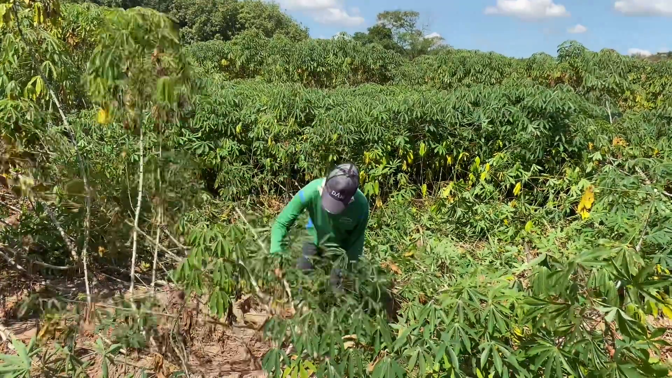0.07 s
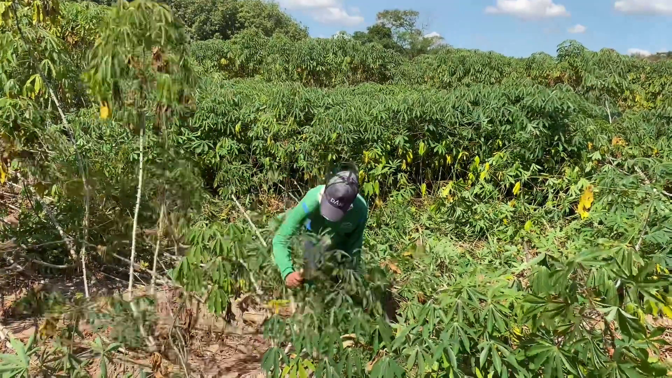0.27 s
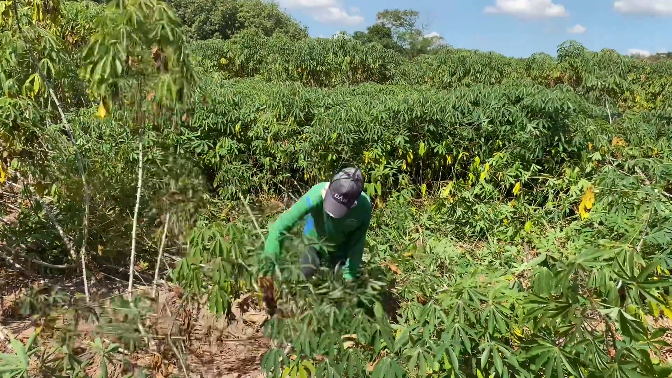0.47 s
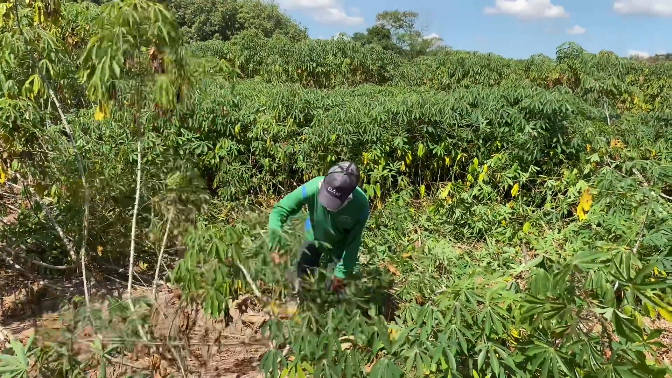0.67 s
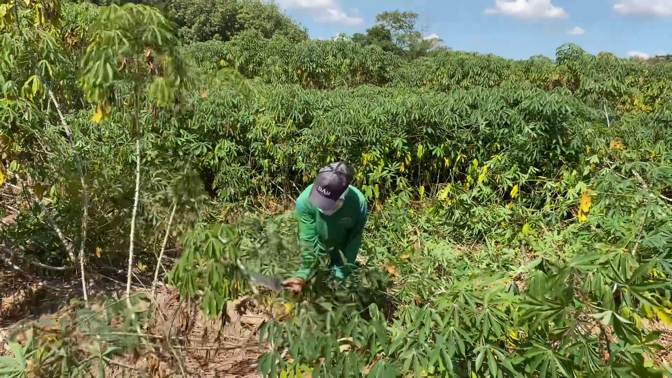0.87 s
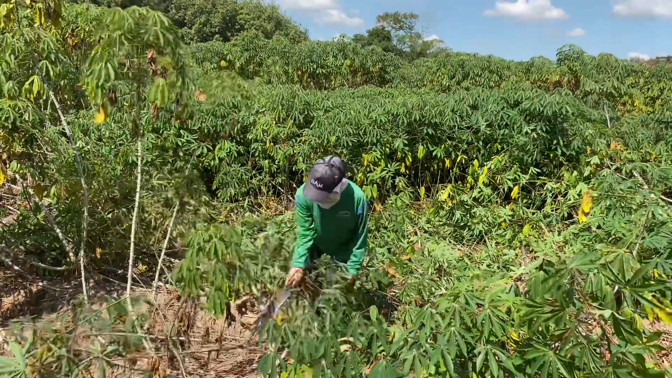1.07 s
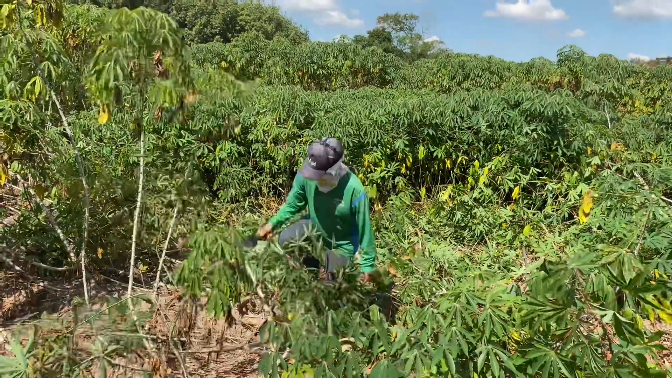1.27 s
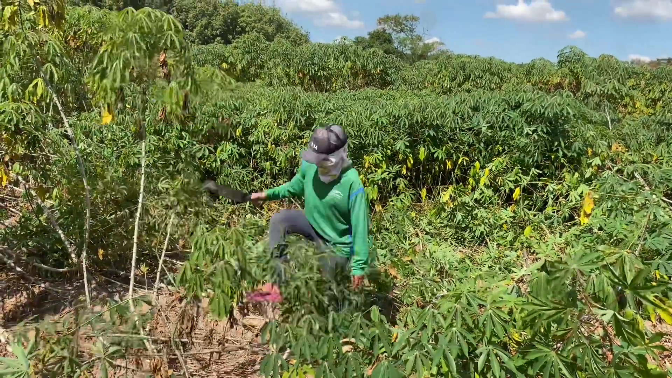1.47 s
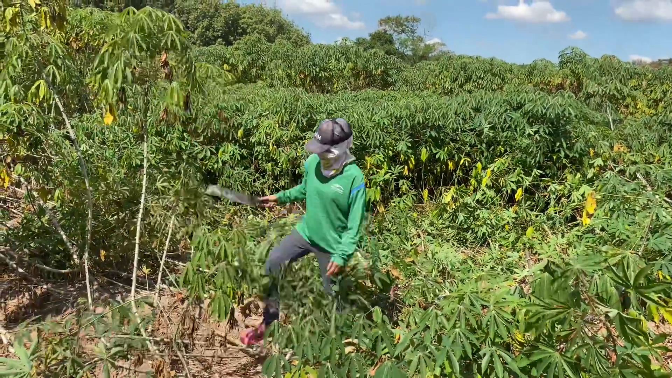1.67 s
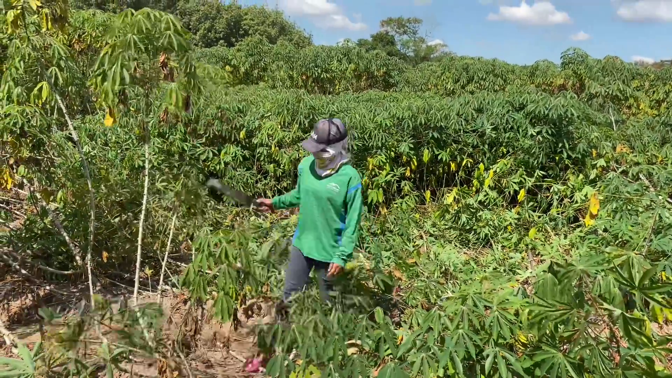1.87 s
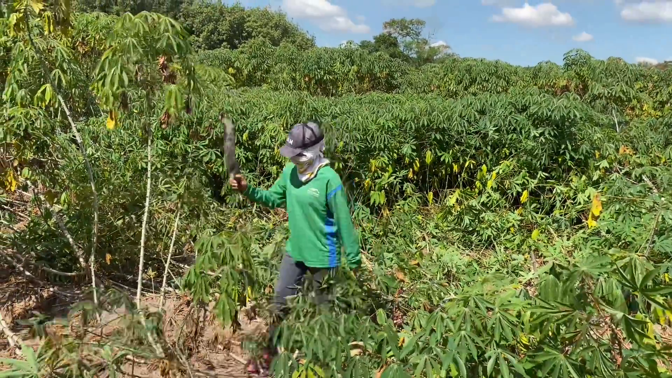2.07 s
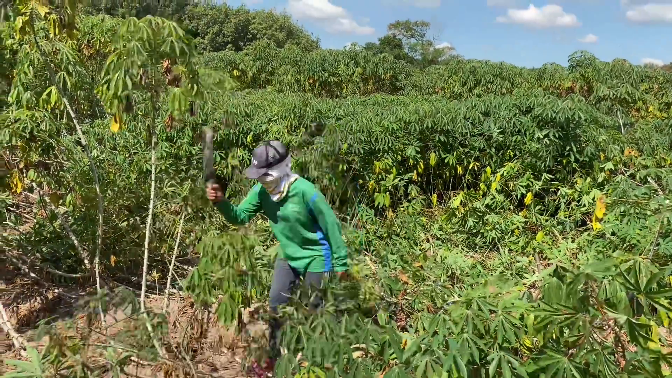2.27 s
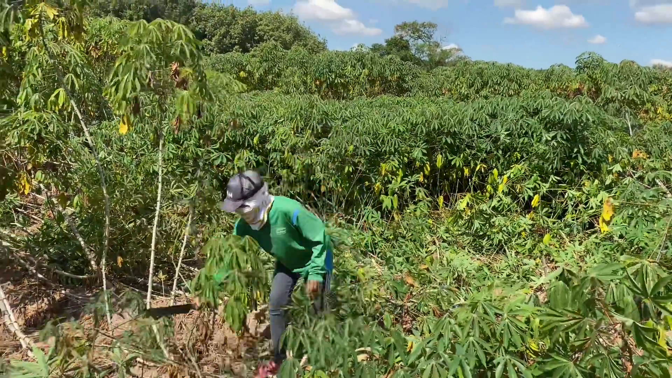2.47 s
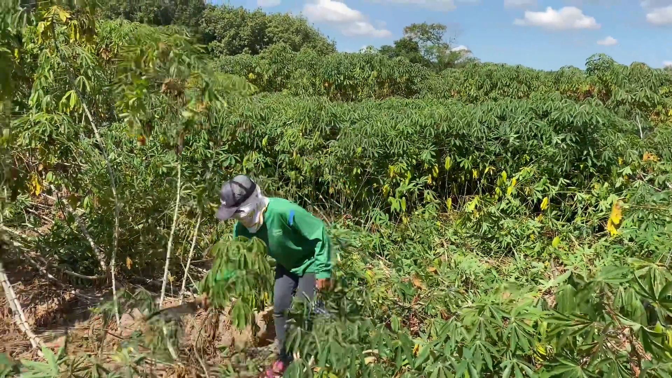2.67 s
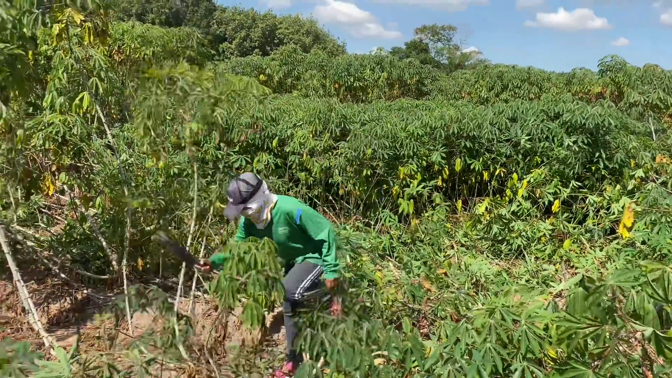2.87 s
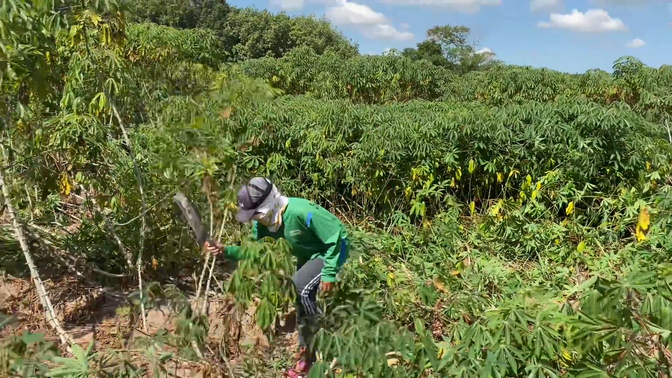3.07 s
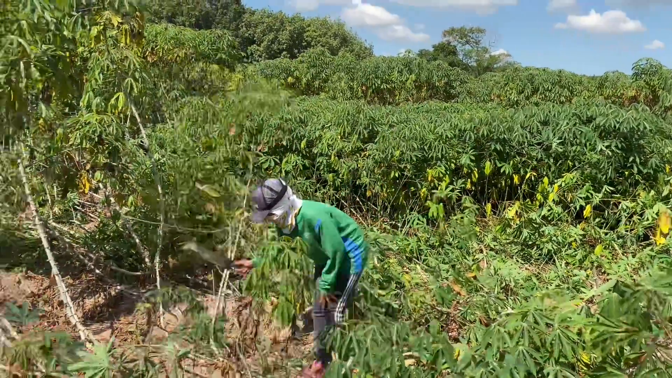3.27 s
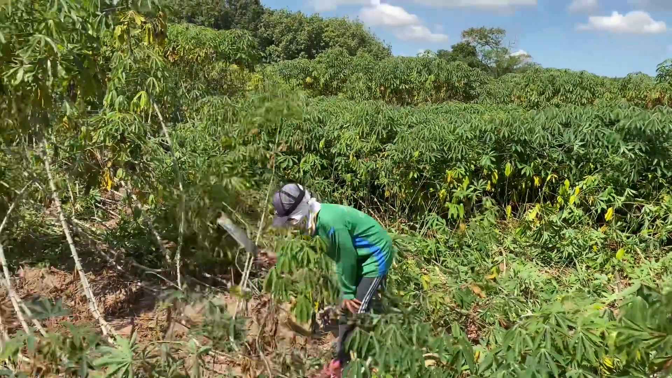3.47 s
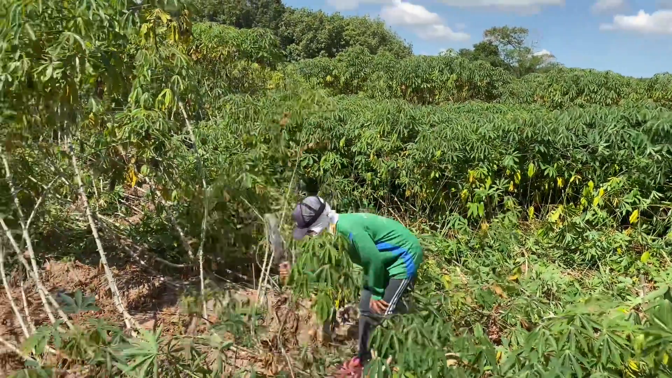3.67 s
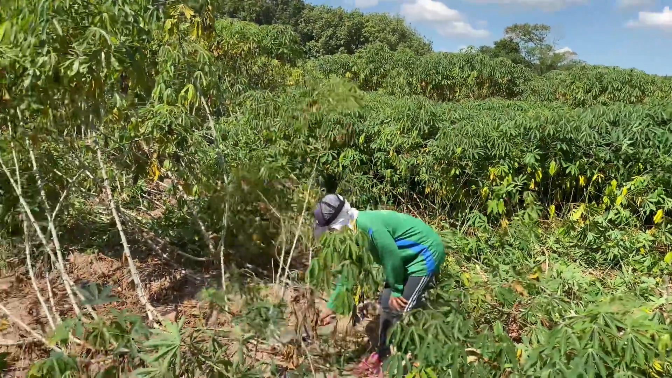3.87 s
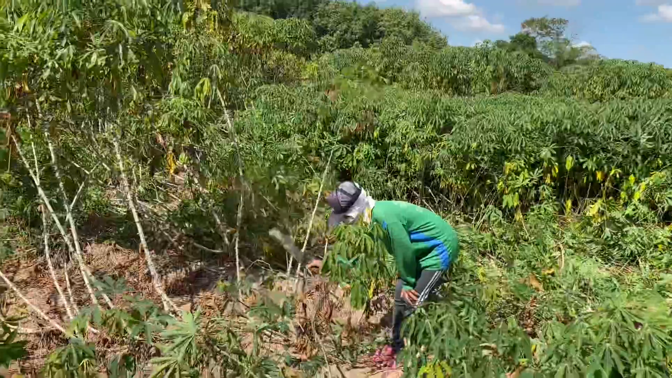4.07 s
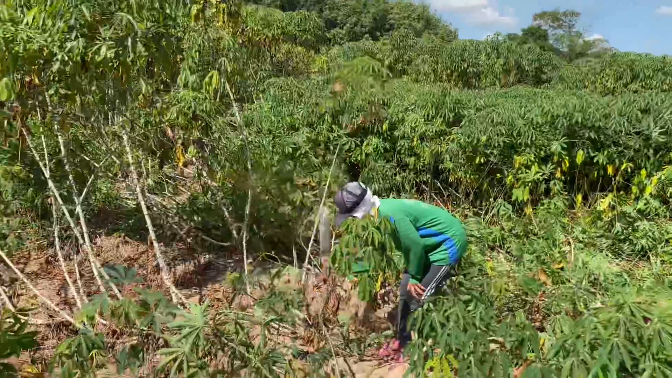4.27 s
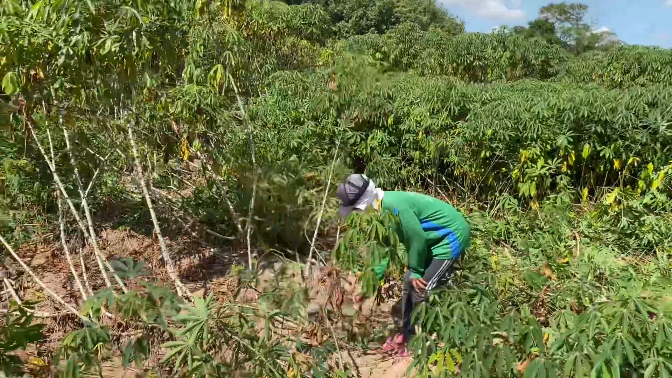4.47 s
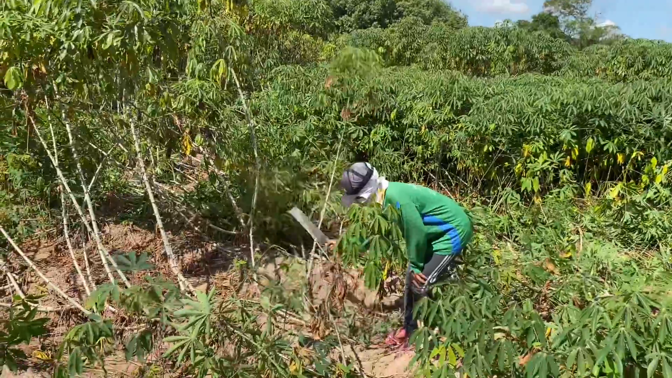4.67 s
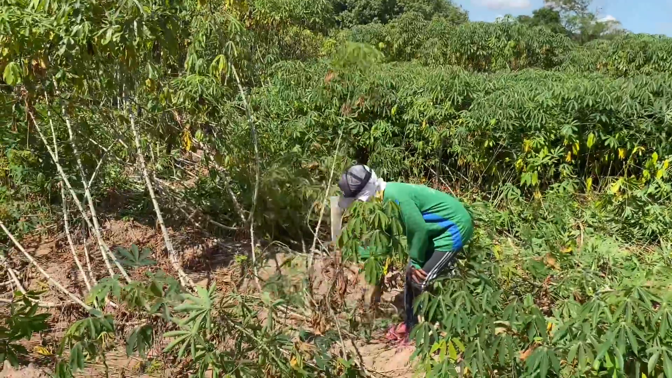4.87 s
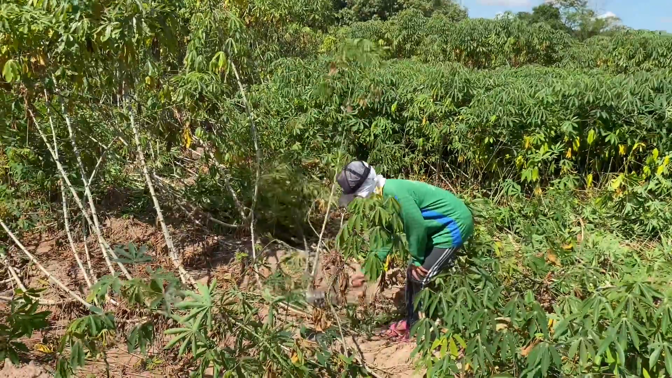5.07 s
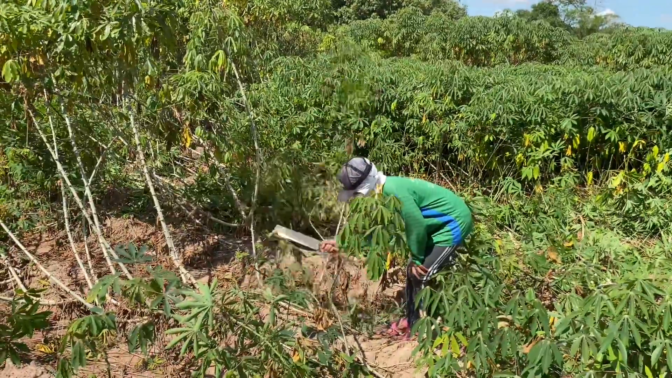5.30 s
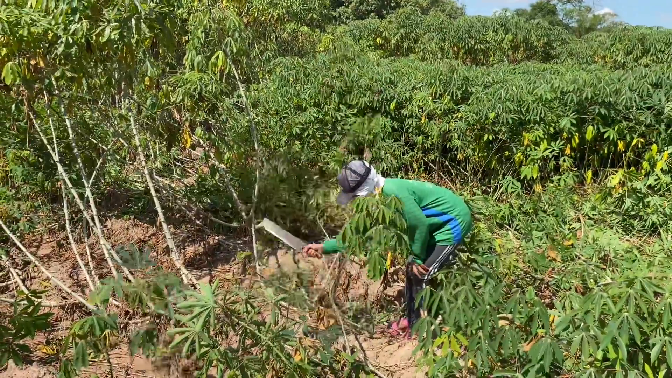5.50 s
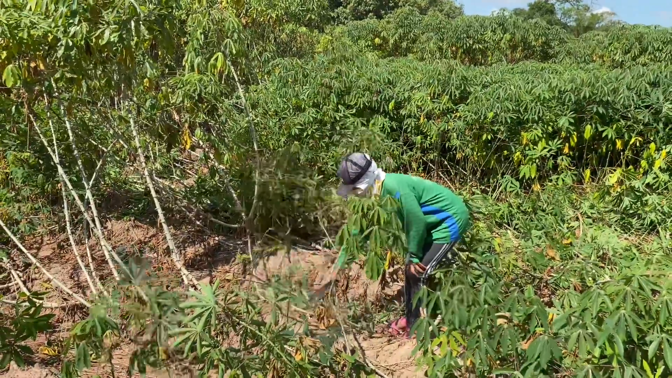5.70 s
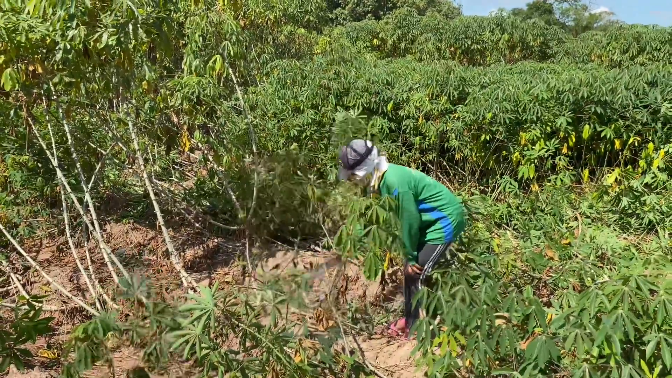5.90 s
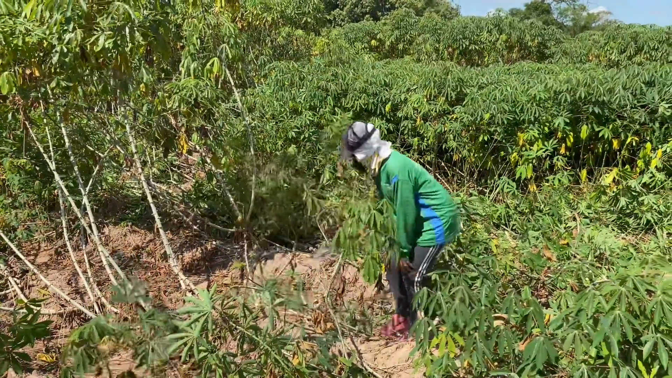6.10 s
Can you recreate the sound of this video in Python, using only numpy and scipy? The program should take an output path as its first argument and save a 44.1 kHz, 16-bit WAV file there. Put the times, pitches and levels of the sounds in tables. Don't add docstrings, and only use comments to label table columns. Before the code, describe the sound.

Dry, sharp chops through fibrous stems, each with a crunchy tear, dull knock, leafy slap and brief steel ring. They come singly or in small clusters, separated by swishing leaves and little stick cracks. The place is open and leafy, with only short diffuse echoes. Wind rumbles softly, growing at the end; a distant machine hums and a small bird chirps once, faintly, past the middle.

```python
import sys
import numpy as np
from scipy import signal
from scipy.fft import rfft, irfft, next_fast_len
from scipy.io import wavfile
from scipy.ndimage import uniform_filter1d, minimum_filter1d, map_coordinates

SR = 44100
rng = np.random.default_rng(int(sys.argv[2]) if len(sys.argv) > 2 else 0)


def invert_db(level):
    return 10 ** (np.asarray(level, dtype=float) / 20)


def put_to_file(sound):
    columns = np.atleast_2d(sound).T
    safe = np.clip(columns, -1, 1)
    whole_steps = np.round(safe * 32767)
    wavfile.write(sys.argv[1], SR, whole_steps.astype(np.int16))


N = 270729


def unit(x):
    return x / np.sqrt(np.mean(x ** 2) + 1e-20)


def along(points, hz):
    f, v = np.transpose(points)
    return np.interp(np.log(hz + 1), np.log(f + 1), v)


def curves(rows):
    s, *columns = np.transpose(rows)
    return [np.interp(np.arange(N) / SR, s, column) for column in columns]


def wobble(rate):
    knots = rng.standard_normal(int(N * rate / SR) + 4)
    return map_coordinates(knots, [np.arange(N) * rate / SR])


def filtered(x, response):
    n = x.shape[-1]
    m = next_fast_len(n + 4096)
    return irfft(rfft(x, m) * response(np.fft.rfftfreq(m, 1 / SR)), m)[..., :n]


def peak(f, hz, width_hz):
    return 1j * f * width_hz / (hz * hz - f * f + 1j * f * width_hz)


def crackle(shape, spectrum, spread_db, envelope=1):
    size = invert_db(spread_db * np.minimum(rng.exponential(size=shape), 3.5))
    grains = size * rng.standard_normal(shape)
    grains = envelope * filtered(grains, lambda f: invert_db(along(spectrum, f)))
    return unit(grains) * np.sqrt(np.mean(np.square(envelope)))


def warble(rows, scatter_hz, patchy_db, rate):
    hz, db = curves(rows)
    level = invert_db(db + patchy_db * wobble(rate))
    return level * np.sin(2 * np.pi * np.cumsum(hz + scatter_hz * wobble(rate)) / SR)


# pitch_hz, side_level_db
WIDTH = [(60, -15.5), (300, -5.5), (1500, -3.5), (3000, -3.5), (6000, -1.5), (6500, -82)]


def wide(pair):
    side = filtered(pair[1], lambda f: invert_db(along(WIDTH, f)))
    return np.array([pair[0] + side, pair[0] - side])


# time_s, level_db
WIND = [(0, -52), (1.1, -54), (2.2, -54), (2.8, -52.5), (3.6, -56.5), (4.8, -51), (5.5, -54.5),
        (5.75, -45.5), (6.14, -41)]
# pitch_hz, level_db (per Hz)
RUMBLE = [(15, -40), (30, -12.5), (71, 1.5), (188, -15), (227, -27), (300, -26), (390, -65), (660, -120)]
# peak_s, level_db
JOLTS = [(.34, -40), (.87, -46), (1.49, -40), (1.66, -46), (2.436, -32.5), (2.77, -57), (3.74, -46),
         (4.32, -43.5), (4.46, -45), (4.91, -39.5), (5.3, -45), (5.42, -53), (5.86, -54), (5.95, -34.5)]
JOLT_RISE_S, JOLT_FALL_S = 0.018, 0.027


def wind():
    t = np.arange(N) / SR
    jolts = 0
    for s, db in JOLTS:
        jolts = jolts + invert_db(db) * np.exp(-np.maximum((s - t) / JOLT_RISE_S, (t - s) / JOLT_FALL_S))
    lumps = invert_db(2.8 * wobble(7.5) + 0.82 * wobble(18))
    buffets = invert_db(curves(WIND)[0]) * unit(lumps * crackle((2, N), RUMBLE, spread_db=-3.5))
    return wide(buffets + jolts * crackle((2, N), RUMBLE, spread_db=-5.0))


# time_s, level_db
STIR = [(0.0, -55.5), (0.3, -51), (0.48, -46), (0.63, -51.5), (0.99, -62.5), (1.4, -55), (1.55, -70),
        (1.66, -44.5), (1.85, -56), (2.22, -57.5), (3.1, -52), (3.5, -58.5), (4.15, -53.5), (4.8, -59),
        (5.2, -53.5), (5.45, -53.5), (5.75, -51.5), (6.14, -61.5)]
# pitch_hz, level_db (per Hz)
LEAVES = [(1000, -19), (2000, 0), (4000, -1), (7000, 1.5), (10000, 0.5), (13000, -1), (15500, -2.5)]
# pitch_hz, level_db (per Hz)
STEMS = [(120, -23), (250, -1.5), (500, -4.5), (1000, -3), (1600, -8.5), (2800, -29.5)]
SHIVER_DB, SHIVER_T60_S = -44, 0.93
STEM_DB, STEM_FOLLOWS = -58, 0.41
DRAG_S, DRAG_HALF_S, DRAG_DB = 1.674, 0.076, -54


def plants():
    t = np.arange(N) / SR
    shiver = 0
    for s, db, *_ in CHOPS + SPLITS:
        shiver = shiver + (t > s) * invert_db(db + SHIVER_DB - 60 * np.abs(t - s) / SHIVER_T60_S) ** 2
    leaf = np.sqrt(invert_db(curves(STIR)[0]) ** 2 + shiver)
    stem = invert_db(STEM_DB) * (leaf / np.median(leaf)) ** STEM_FOLLOWS
    stem = stem + invert_db(DRAG_DB) * np.exp(-((t - DRAG_S) / DRAG_HALF_S) ** 4)
    stir = wobble(24.9)
    leaf = leaf * invert_db(5.0 + 0.62 * stir + 1.21 * wobble(110))
    stem = stem * invert_db(2.1 * stir + 0.48 * wobble(40))
    leaves = leaf * crackle((2, N), LEAVES, spread_db=2.0)
    stems = stem * crackle((2, N), STEMS, spread_db=2.5)
    return wide(leaves + stems)


# pitch_hz, width_hz, level_db
DRONE = [(855.5, 55, -69), (1530, 1350, -68), (1690, 90, -72)]
# time_s, pitch_hz, level_db
WHINE = [(0, 1700, -72), (1.1, 1715, -65), (1.8, 1700, -72), (2.2, 1700, -65), (3.6, 1690, -70),
         (4.8, 1690, -63), (5.05, 1574, -59), (5.3, 1580, -68), (6.14, 1630, -70)]


def machine():
    noise = rng.standard_normal((2, N))
    drone = 0
    for hz, width_hz, db in DRONE:
        band = unit(filtered(noise, lambda f: peak(f, hz, width_hz) ** 2))
        drone = drone + invert_db(db + 1.5 * wobble(5)) * band
    whine = invert_db(3 * wobble(5)) * warble(WHINE, scatter_hz=90, patchy_db=4, rate=130)
    return wide(drone) + whine


# knock_db, slap_db
KINDS = [
    (-29, -14),
    (-30.5, -23),
    (-32.5, -20.5),
    (-28, -8),
]
# start_s, peak_db, t60_s, stalk_pitch_hz
CHOPS = [(0.256, -27, 0.25, 4100), (0.284, -6, 0.074, 2340), (0.291, -9, 0.04, 1150),
         (0.297, -10, 0.033, 2650), (0.307, -14.5, 0.042, 2170), (1.467, -7.5, 0.017, 2980),
         (2.41, -20.5, 0.16, 2700), (2.421, -13.5, 0.069, 1440), (2.427, -13.5, 0.053, 2810),
         (2.437, -21, 0.15, 2280), (3.722, -4.5, 0.04, 2280), (4.296, -8, 0.047, 2140),
         (4.316, -20.5, 0.2, 2110), (4.903, -13, 0.034, 2050), (4.909, -17, 0.087, 2250),
         (5.554, -15.5, 0.049, 2380), (5.572, -21.5, 0.15, 2150), (5.637, -27, 0.042, 3020),
         (5.649, -23.5, 0.082, 2960)]
# start_s, peak_db, t60_s, stem_pitch_hz
SPLITS = [
    (0.832, -20.5, 0.039, 872),
    (0.843, -5.5, 0.042, 760),
    (0.852, -13.5, 0.055, 1240),
    (0.871, -20.5, 0.072, 2200),
    (3.106, -22, 0.036, 2700),
    (3.147, -16.5, 0.021, 724),
    (3.717, -9, 0.049, 1180),
    (3.744, -16.5, 0.11, 2100),
    (4.896, -6.5, 0.057, 2020),
    (5.27, -17, 0.044, 1240),
]
# start_s, peak_db, t60_s, stick_pitch_hz
STICKS = [(1.255, -36, 0.043, 1310), (1.349, -36.5, 0.076, 2770), (2.052, -24.5, 0.013, 950),
          (2.561, -35, 0.094, 2125), (3.702, -31.5, 0.03, 1150), (3.789, -29.5, 0.27, 2060),
          (4.697, -37.5, 0.063, 1940), (4.871, -30, 0.024, 1710), (4.986, -33, 0.05, 2610),
          (5.111, -50, 0.039, 1530), (5.474, -31.5, 0.058, 2430), (5.707, -33.5, 0.09, 802)]
# start_s, peak_db, t60_s, branch_pitch_hz
BRANCHES = [(0.087, -41, 0.022, 1050), (0.488, -34.5, 0.047, 2070), (1.088, -48.5, 0.029, 2080),
            (1.514, -25.5, 0.018, 2270), (1.57, -30.5, 0.039, 3080), (1.582, -26.5, 0.057, 1120),
            (2.099, -44, 0.25, 885), (2.876, -35, 0.012, 2880), (2.937, -52, 0.033, 918),
            (3.353, -36.5, 0.027, 3700), (3.474, -52, 0.072, 845), (4.768, -47.5, 0.022, 810),
            (5.19, -45, .03, 3000), (5.369, -43, 0.034, 2880), (5.515, -36, 0.07, 3650),
            (5.541, -32, 0.08, 4060), (6.105, -59, 0.045, 850)]
# pitch_hz, level_db (per Hz)
FIBRE = [(400, -7.5), (800, -5), (1200, 0.5), (2100, -0.5), (3500, -2), (5000, -9.5), (9000, -13)]
# pitch_hz, level_db (per Hz)
SLAP = [(2500, -14.5), (4500, -4.5), (6500, -1), (9000, 0.5), (12000, -6), (15500, -5.5)]
# pitch_hz, level_db (per Hz)
KNOCK = [(60, 1), (110, 5), (200, 6), (400, -4.5), (700, -2), (1200, -22.5)]
# one row each for mid_db, side_db
NEAR = np.array([[0], [-6]])
KNOCK_LAGS, SLAP_LAGS = 0.41, 0.26


def cuts():
    out, t = np.zeros((2, N + SR)), np.arange(SR // 6) / SR
    clumps = np.pad(invert_db(2 * wobble(300)), (0, SR))

    def dies(t60, rise_s):
        return invert_db(-60 * (t / np.clip(t60, .006, .2)) ** 1.254) * (1 - np.exp(-t / rise_s))

    first = 1.08 * dies(0.0049, 0.0001)
    for rows, (knock_db, slap_db) in zip((CHOPS, SPLITS, STICKS, BRANCHES), KINDS):
        for s, db, t60, hz in rows:
            tears = clumps[round(s * SR):][:len(t)] * dies(t60, 0.00075)
            snaps = crackle((2, len(t)), FIBRE, spread_db=4.5, envelope=first + tears)
            snaps = filtered(snaps, lambda f: 0.65 + 1.22 * peak(f, hz, 0.13 * hz) + .7 * peak(f, 5430, 450))
            knock = crackle(len(t), KNOCK, spread_db=-0.5, envelope=dies(2.62 * t60, 0.0023))
            knock = invert_db(knock_db - KNOCK_LAGS * db) * knock
            slap = crackle((2, len(t)), SLAP, spread_db=-0.5, envelope=first + dies(1.37 * t60, 0.00091))
            slap = invert_db(slap_db - SLAP_LAGS * db) * slap
            blow = wide(invert_db(NEAR - 11.5) * snaps + invert_db(-2.22) * slap) + knock
            out[:, round((s - .0001) * SR):][:, :len(t)] += invert_db(db) * blow
    return out[:, :N]


# start_s, main_level_db, t60_s, lesser_modes_db, until_damped_s
RINGS = [
    (.295, -37, .6, -1, .21),
    (.748, -47, .7, -8, .075),
    (.872, -35, .3, -3, .03),
    (.95, -50, .5, -1, .12),
    (2.555, -48, .4, 5, .09),
    (3.735, -29, .22, 0, .095),
    (4.30, -30, .2, -3, .05),
    (4.9, -28, .11, 0, .06),
    (5.57, -33, .18, -3, .065),
]
# pitch_hz, level_db, share_of_t60 (no unit)
BLADE = [(1227, -8, .3), (1390, -12, .45), (2030, -7, .7), (2090, 0, 1.3), (2185, -6, .8), (2310, -5, .55),
         (2630, -9, .5), (3120, -10, .4), (3750, -20, .3), (5460, -24, .25)]


def blade():
    out, t = np.zeros(N + SR), np.arange(SR // 3) / SR
    grip = wobble(70)
    for s, db, t60, side_db, lasts in RINGS:
        chance = rng.standard_normal((len(BLADE), 2))
        free = (1 - np.exp(-t / 0.0053)) * invert_db(-60 * np.clip(t - lasts, 0, None) / 0.03)
        for (hz, level_db, share), (strength, drift) in zip(BLADE, chance):
            waver = invert_db(2 * np.roll(grip, round(hz - s * SR))[:len(t)])
            lesser_db = (side_db + 3 * strength) * (level_db < -3)
            fade = free * invert_db(db + level_db + lesser_db - 60 * t / (share * t60))
            sway = .25 * np.roll(grip, -round(hz + s * SR))[:len(t)]
            tone = np.sin(2 * np.pi * hz * (1 + .004 * drift) * t + sway)
            out[round(s * SR):][:len(t)] += waver * fade * tone
    return out[:N]


# start_s, pitch_hz,
# level_db, t60_s
PINGS = [(.844, 720, -24, 0.033), (0.86, 1250, -33, .05), (.952, 3420, -47, 0.12), (.953, 2740, -47, .1),
         (1.255, 1300, -42, 0.048), (1.468, 1700, -20, 0.028), (2.43, 140, -30, .1), (2.56, 1400, -47, .15),
         (2.645, 110, -46, .12), (3.147, 700, -27, 0.025), (4.296, 960, -18.5, 0.032),
         (4.298, 3300, -17, .03), (4.305, 2900, -23.5, 0.063), (4.532, 400, -38, .04),
         (4.533, 750, -40, .03), (4.897, 1580, -24, 0.021), (4.898, 1190, -16.5, 0.039),
         (5.27, 310, -29, 0.039), (5.271, 1250, -30, .04), (5.517, 3720, -38, 0.06), (5.555, 310, -27, .08),
         (5.57, 2750, -36, .04), (5.638, 3080, -38, 0.055), (5.645, 7000, -40, .06), (5.657, 170, -32, .15),
         (5.735, 70, -34, .15), (5.935, 85, -27, .15), (6.02, 650, -52, .2)]


def twigs():
    out, t = np.zeros(N + SR), np.arange(SR // 4) / SR
    for s, hz, db, t60 in PINGS:
        fade = invert_db(db - 60 * t / t60) * (1 - np.exp(-t / 0.0011))
        out[round(s * SR):][:len(t)] += fade * np.sin(2 * np.pi * hz * t)
    return out[:N]


# pitch_hz, t60_s
FIELD = [(200, 0.32), (2000, 0.35), (10000, 0.36)]


def scatter(x):
    hz, t, z = signal.stft(rng.standard_normal((2, SR // 3)), SR, nperseg=256)
    fade = invert_db(-60 * t / along(FIELD, hz)[:, None])
    tail = signal.istft(z * fade, SR, nperseg=256)[1]
    tail = tail / np.linalg.norm(tail[0])
    return wide(signal.fftconvolve(x[None], tail, axes=1)[:, :N])


# start_s, length_s, from_pitch_hz, to_pitch_hz, level_db
BIRD = [
    (4.224, .012, 4200, 4150, -52),
    (4.24, .016, 3800, 4050, -52),
    (4.264, .009, 4000, 3800, -52),
    (4.276, .028, 3550, 3470, -52),
]


def bird():
    chirp, edge_s = 0, .006
    for s, lasts, top, end, db in BIRD:
        note = [(s - edge_s, top, -110), (s, top, db), (s + lasts, end, db), (s + lasts + edge_s, end, -110)]
        chirp = chirp + warble(note, scatter_hz=40, patchy_db=1.5, rate=120)
    return invert_db(3) * chirp


def hush(work):
    ahead = -minimum_filter1d(-np.abs(work), size=2001, origin=-1000)
    return invert_db(uniform_filter1d(-4 * np.clip(ahead / 0.72, 0, 1), size=600))


def scene():
    work = cuts() + blade() + twigs()
    background = plants() + machine() + bird()
    return work + invert_db(-22) * scatter(work.mean(0)) + hush(work[0]) * background + wind()


def roll_off(x):
    return signal.sosfilt(signal.butter(12, 16970, fs=SR, output="sos"), x)


# pitch_hz, level_db
LEAN = [(100, 0.7), (1000, 0), (4500, 1.55), (6300, 0)]
TURN_HZ, CYCLE_HZ, TOP_HZ = 6950, 4130, 15900


def record(dry):
    def turn(f):
        ramp = np.pi * np.clip((f - TURN_HZ) / CYCLE_HZ, 0, 2)
        return ramp - 0.12 * np.sin(4 * ramp)

    def response(f):
        lean_db = np.outer([1, -1], along(LEAN, f))
        phase = np.outer([-1, 1], turn(f))
        return np.exp(1j * phase) * invert_db(lean_db - 47 * (f > TOP_HZ))

    return roll_off(filtered(dry, response))


dry = scene()
out = record(dry)
put_to_file(out)
```